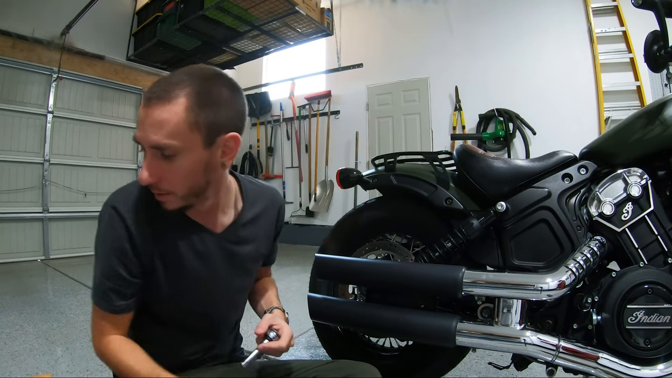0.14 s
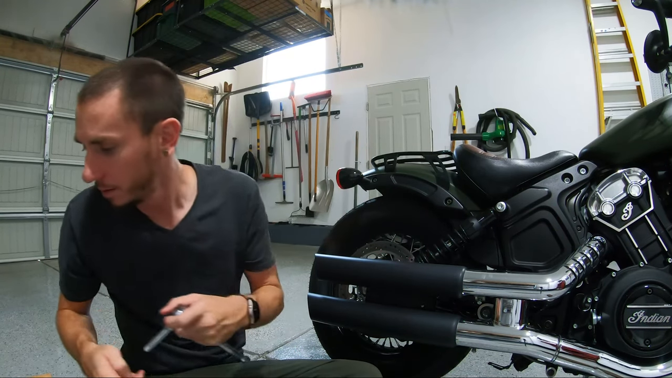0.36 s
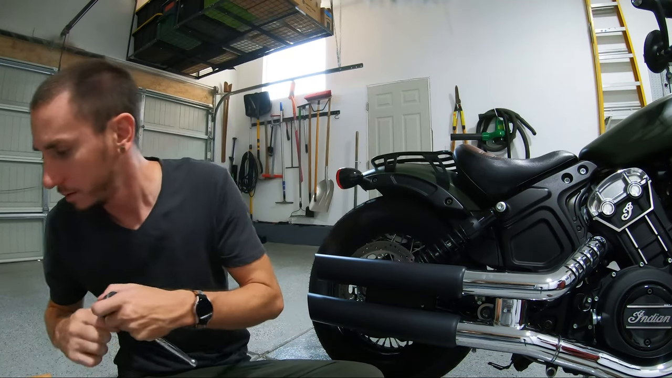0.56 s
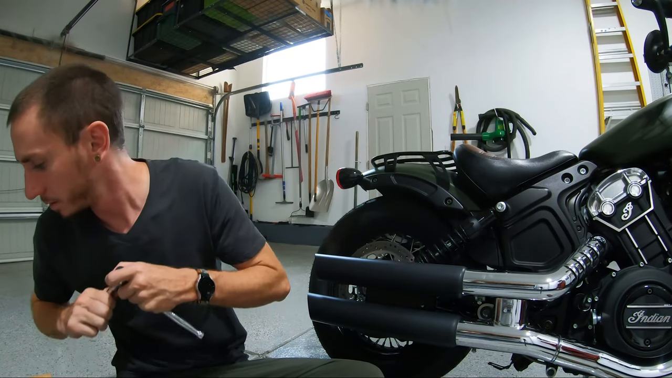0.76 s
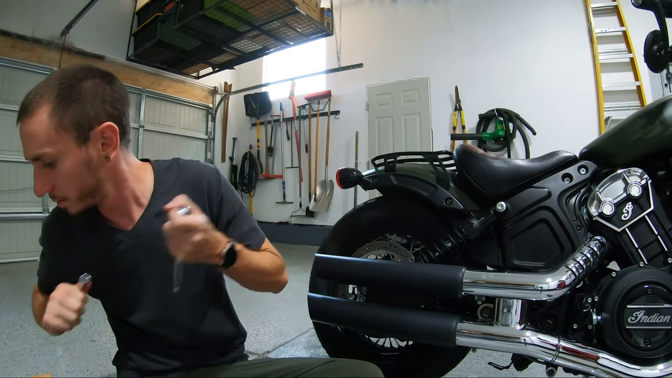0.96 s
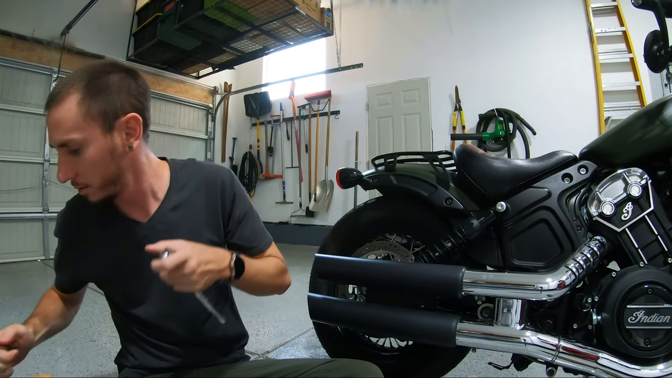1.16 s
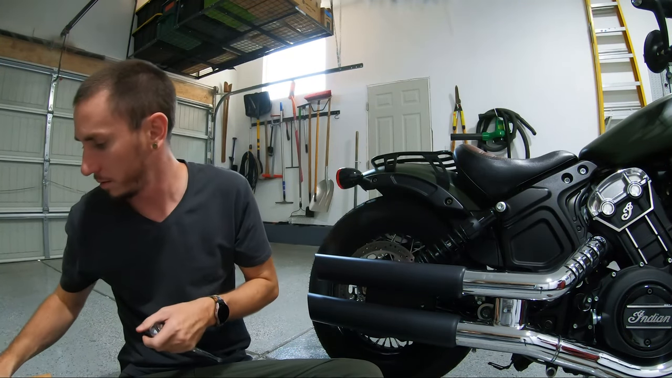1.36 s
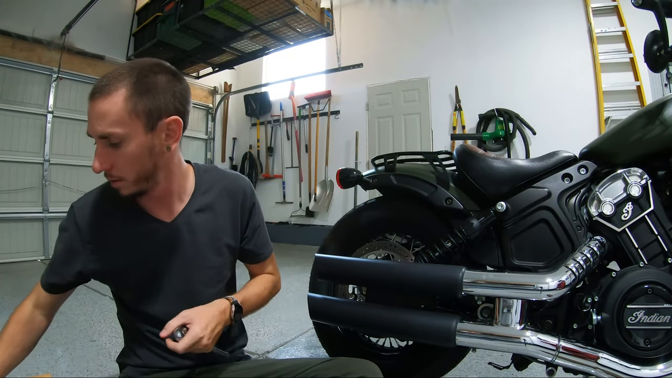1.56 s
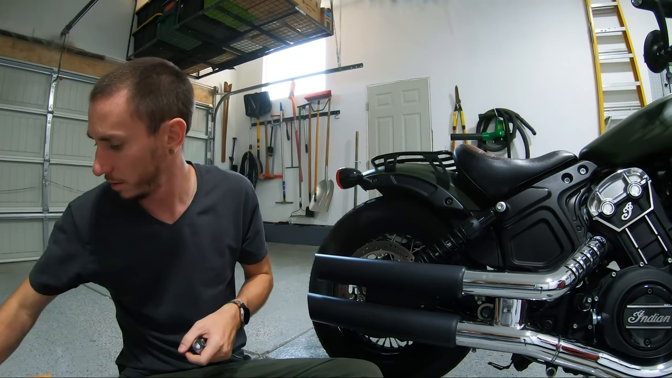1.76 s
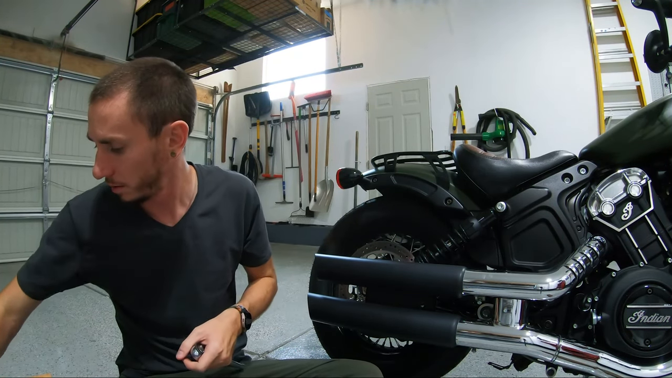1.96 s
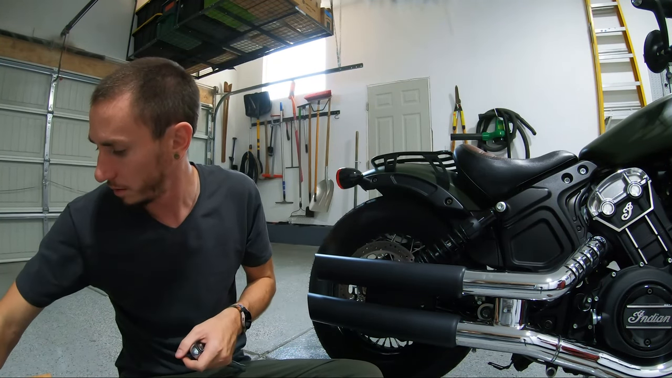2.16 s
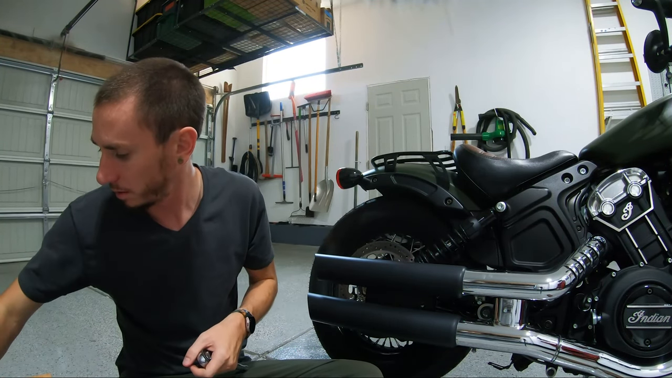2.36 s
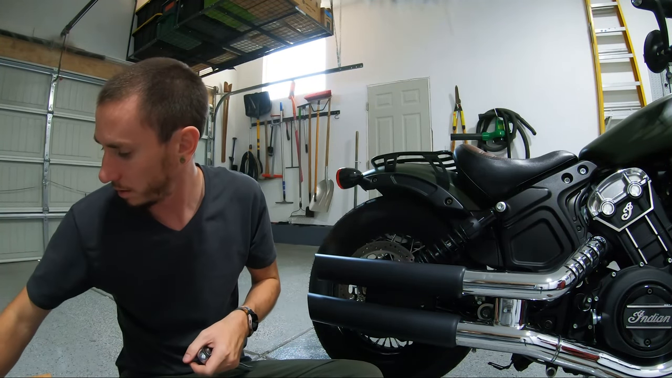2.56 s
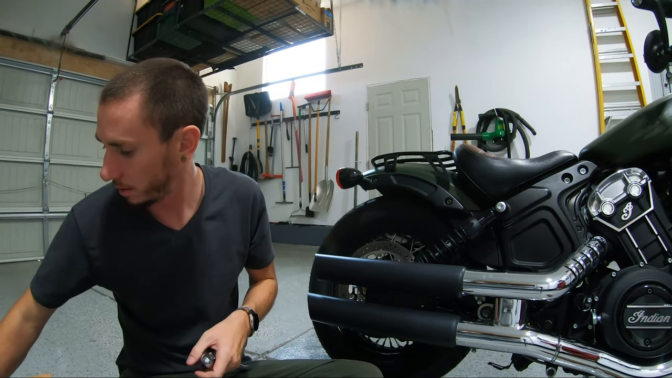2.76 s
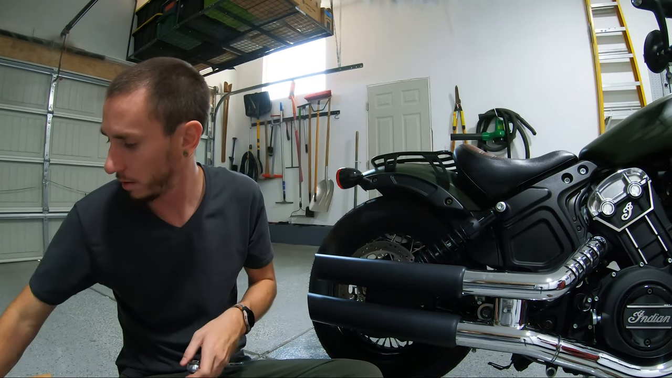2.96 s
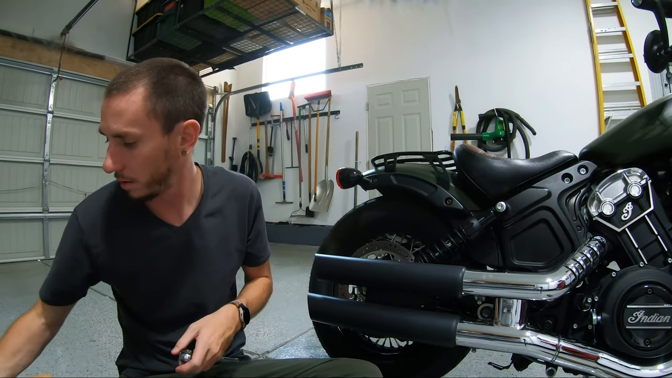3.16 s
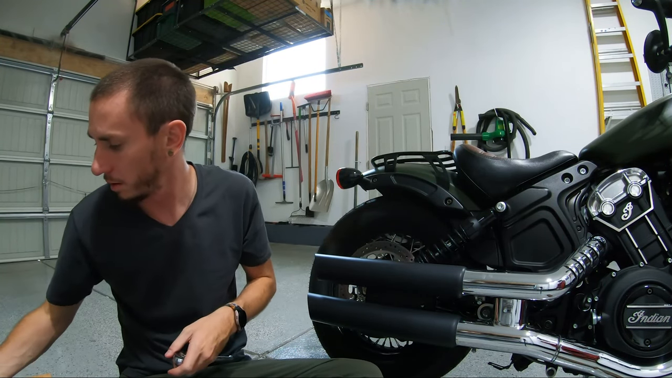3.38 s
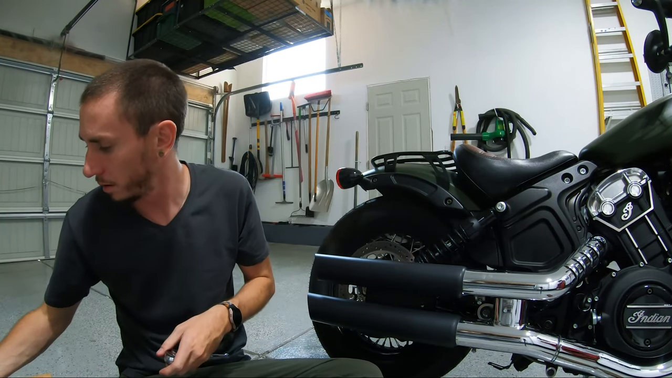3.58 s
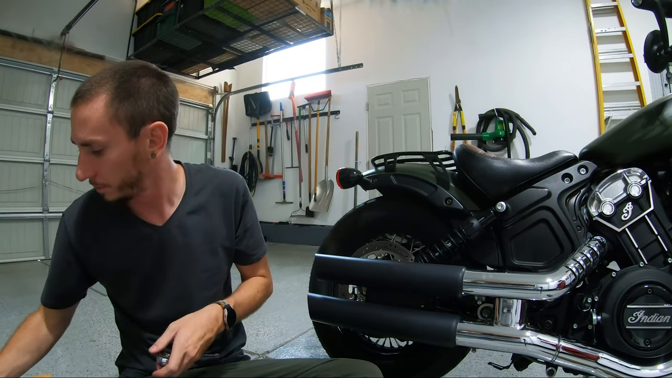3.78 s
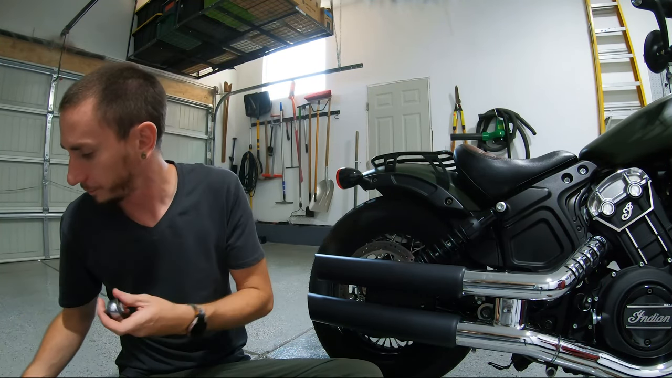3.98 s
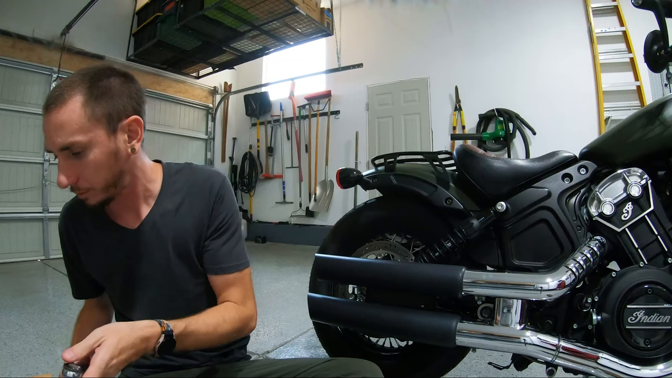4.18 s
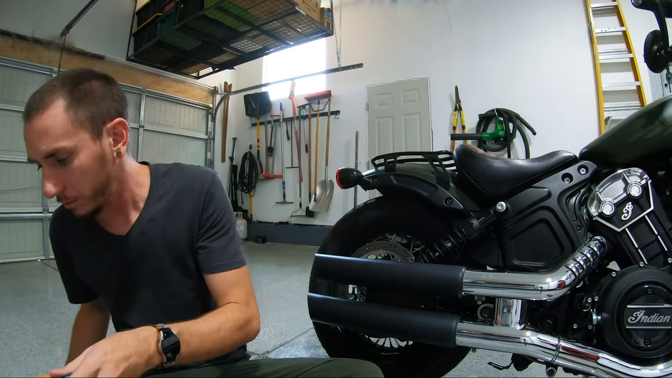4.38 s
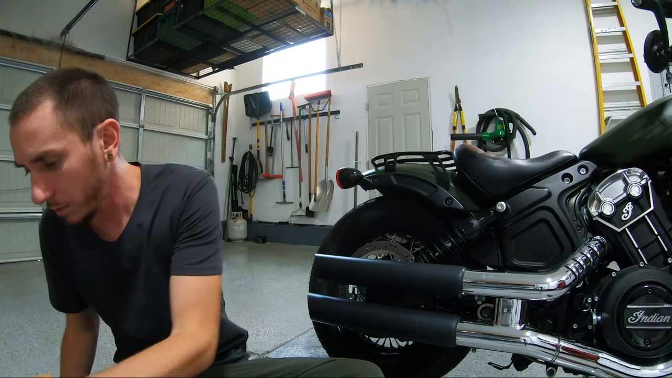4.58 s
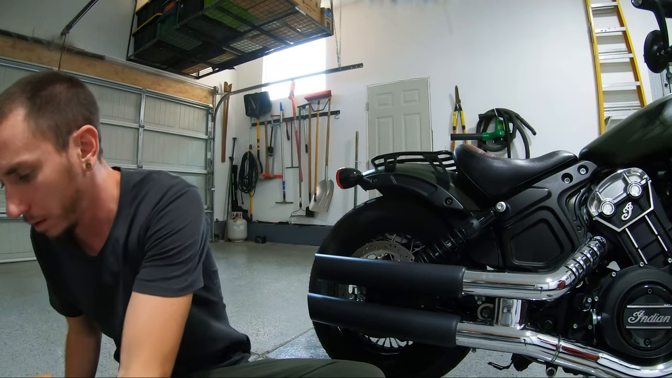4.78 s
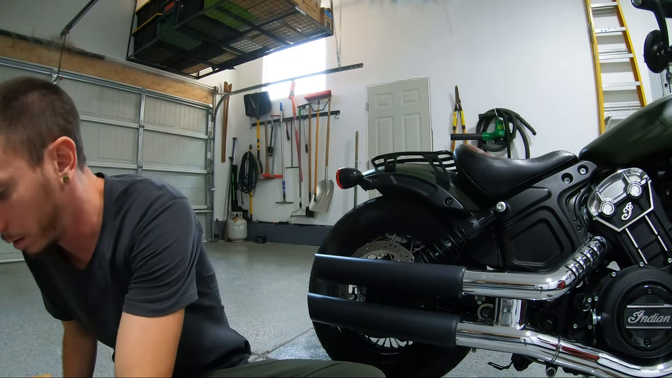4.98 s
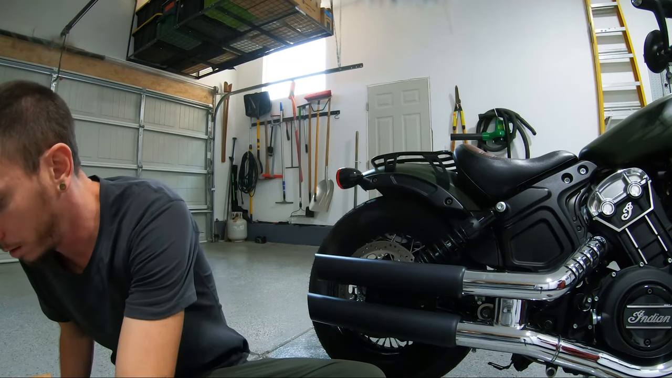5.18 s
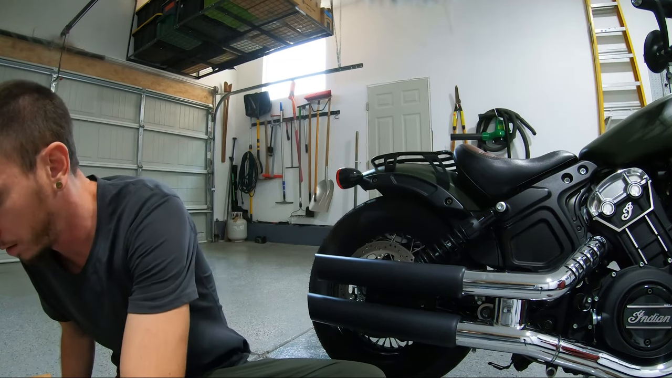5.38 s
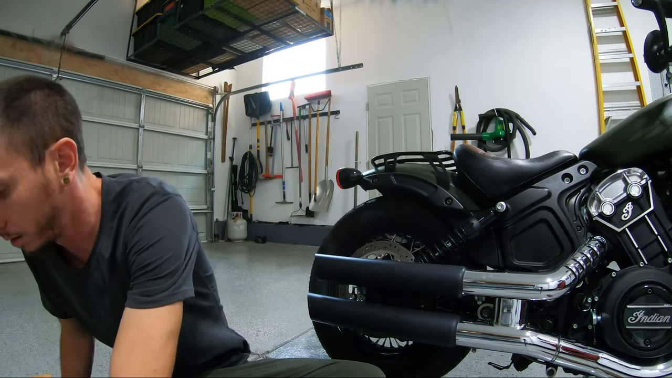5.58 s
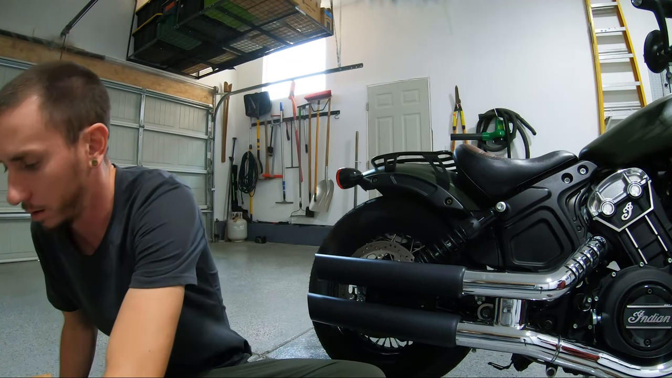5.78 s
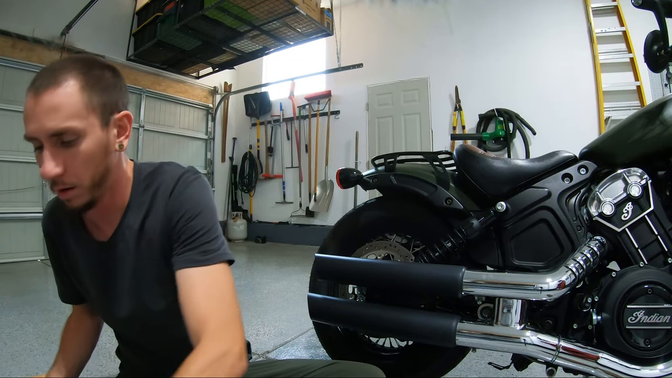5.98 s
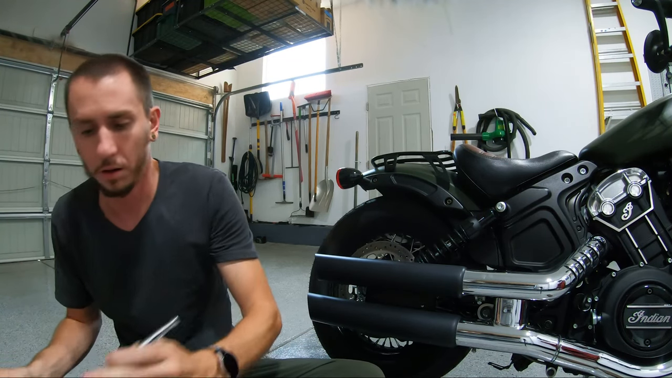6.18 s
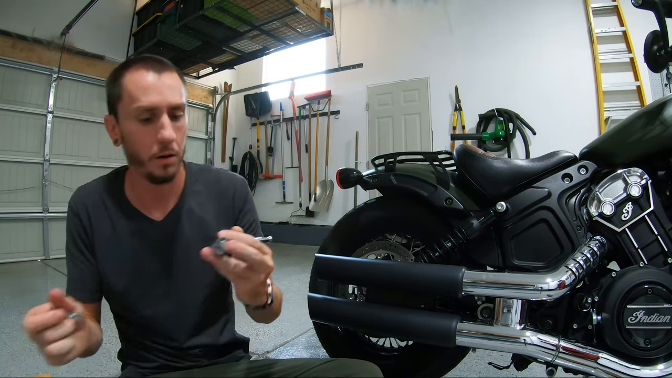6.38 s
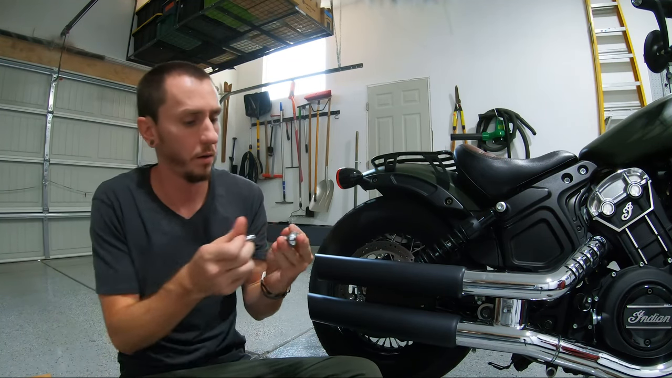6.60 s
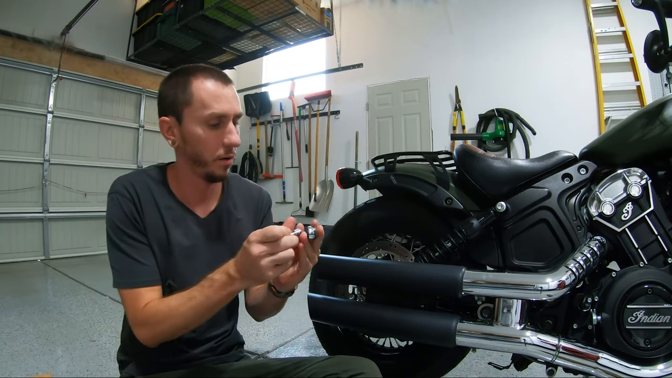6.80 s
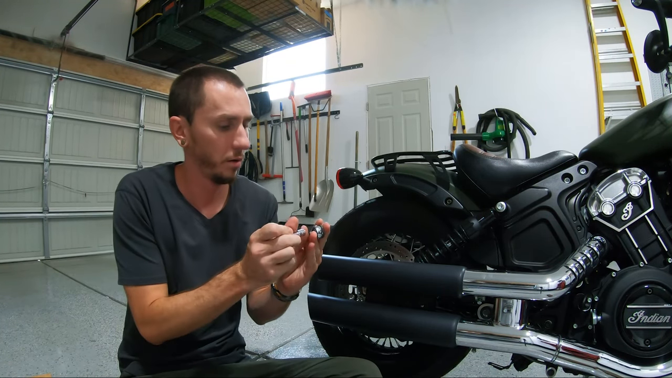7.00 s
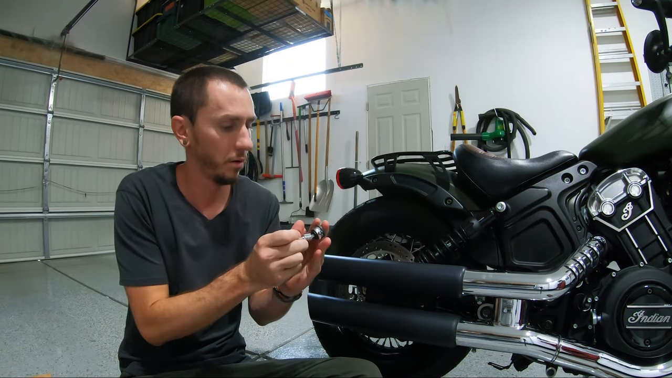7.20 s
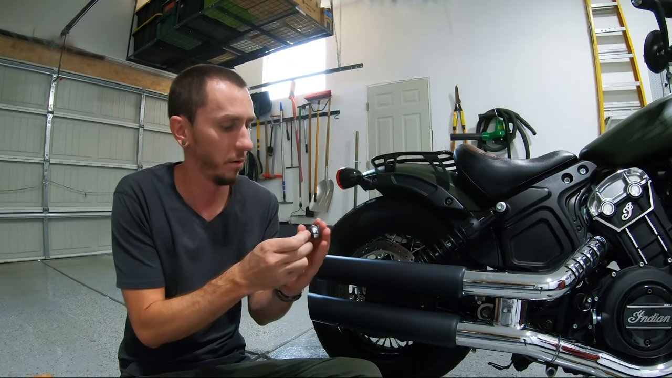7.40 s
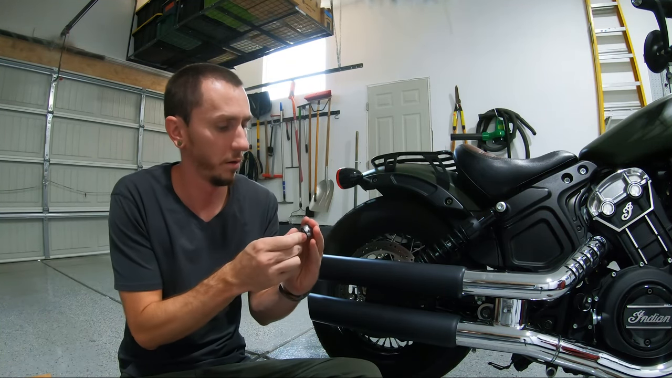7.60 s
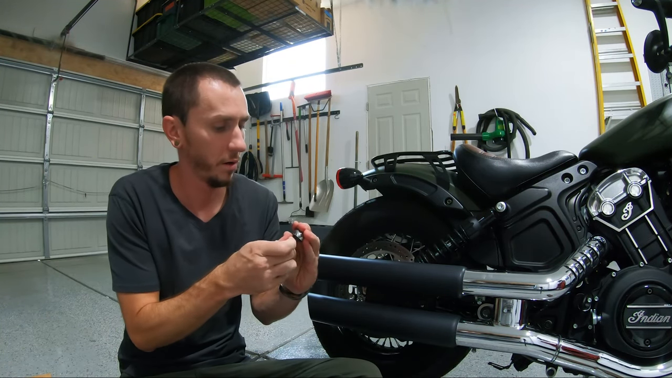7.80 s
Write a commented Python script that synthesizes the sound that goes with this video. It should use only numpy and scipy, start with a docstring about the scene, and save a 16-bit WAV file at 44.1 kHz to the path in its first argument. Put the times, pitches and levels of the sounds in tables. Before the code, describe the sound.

A steady, low, slightly wavering machine hum with soft air noise runs throughout in a hard, reverberant garage. From 0 to 1.3 s, hands and sleeves rustle faintly while a steel handle clinks and a ratchet clicks against a held socket, clearest near 0.75 and 1.0 s. Around 2.1-2.3 s come several light, woody knocks on a socket case, then weak taps near 2.8 s with a small loose-socket clink, and another at 3.1 s. Mostly hum until a faint click at 4.45 s. From 4.9 to 5.45 s a loud rummage erupts: hollow thumps, hard clacks, chattering small parts and bright ringing sockets in two tight clusters, echoing away. Softer knocks and a long-bar ring follow to 5.85 s. At 6.75 and 6.9 s, crisp close snaps with very high pings seat the socket; small irregular ratchet clicks continue to about 7.8 s.

```python
"""A socket case knocks and clatters as someone rummages in it: each blow excites its hollow, panels and hard contacts.
A ratchet clicks close by, as short damped resonances of gripped steel; a small socket pings as it seats on its drive.
Loose steel parts ring in their own modes, small parts chatter after each blow, and hands and sleeves rustle.
A hard garage adds a diffuse echo over a steady low machine hum and air noise; both channels carry the same signal."""
import sys
import numpy as np
from scipy import signal
from scipy.fft import rfft, irfft
from scipy.io import wavfile
from scipy.ndimage import uniform_filter1d

SR = 44100
rng = np.random.default_rng(int(sys.argv[2]) if len(sys.argv) > 2 else 0)


def to_wav(sig):
    """Store sig (one row per channel, or 1-D mono) as 16-bit WAV at the path in sys.argv[1].

    Samples outside -1..1 are clipped; the rate is SR.
    """
    pcm = np.clip(np.atleast_2d(sig), -1, 1) * 32767
    pcm = np.round(pcm).astype(np.int16)
    wavfile.write(sys.argv[1], SR, pcm.T)  # frames by channels


N = 346140

# Blows on the case: t/s, relative force/dB, clack pitch f/Hz, extra thump level/dB from landing over the hollow
BLOWS = [(2.096, -26, 700, -10), (2.108, -17.5, 723, -4), (2.155, -25, 744, -4), (2.236, -14, 970, 4.5),
         (2.273, -13.5, 730, 2), (2.765, -30, 928, -7), (2.797, -31, 930, 0), (3.104, -24, 835, -4),
         (4.929, -19, 1300, 12), (5.066, -16, 970, 9.5), (5.084, -11, 806, 8.5), (5.101, -9, 1006, 4.5),
         (5.293, -11.5, 1050, 8), (5.320, -10.5, 1400, 4.5), (5.343, -14.5, 990, 4), (5.367, -8.5, 826, 1),
         (5.411, -7.5, 855, 1.5), (5.439, -16.5, 1100, 6.5), (5.604, -38, 893, 0), (5.681, -30, 1140, 0),
         (5.833, -23, 1114, -5.5)]
FIRM_BLOW_DB = -10  # the force for which the levels of the case are set
TOP_HZ = 15900  # upper band limit


def undb(db):
    """Amplitude ratio of a level: 20 dB is a factor of ten."""
    return 10 ** (np.asarray(db) / 20)


def unit(x):
    """Normalisation by the root mean square, to rms 1."""
    return x / np.sqrt(np.mean(x ** 2))


def on_log(hz, points):
    """Linear interpolation of (f/Hz, value) points on a logarithmic frequency axis."""
    f, value = np.transpose(points)
    return np.interp(np.log(hz + 1), np.log(f), value)


def noise(spectrum, size):
    """Spectral shaping: white noise weighted in frequency, then set to rms 1."""
    hz = np.arange(size // 2 + 1) * SR / size
    white = rfft(rng.standard_normal(size))
    return unit(irfft(white * undb(on_log(hz, spectrum)), size))


def walk(rate):
    """Random modulation: held random values, rate per second, smoothed by a moving average to rms near 1."""
    hold = int(SR / rate)
    steps = np.repeat(rng.standard_normal(N // hold + 1), hold)
    return unit(uniform_filter1d(steps, hold)[:N])


def fade(t60, size=SR // 2):
    """Exponential decay of a damped mode, 60 dB down after t60 seconds."""
    return np.exp(-np.log(1000) * np.arange(size) / SR / t60)


def burst(spectrum, t60, evenness=0.99):
    """High modal overlap: countless modes decay together, coloured by a minimum-phase filter with a sharp start."""
    size = SR // 2
    envelope = fade(t60)
    modes = rfft(rng.standard_normal(size) * envelope)
    # level the spectrum: so many modes overlap that no single one stands out
    even_modes = modes / (np.abs(modes) + 1e-9) ** min(evenness, 1)
    grain = irfft(even_modes, size) * fade(t60 * 10)
    hz = np.arange(len(modes)) * 2.  # the bins lie 2 Hz apart
    cepstrum = irfft(np.log(undb(on_log(hz, spectrum))), size)
    # folding the cepstrum makes the filter causal: nothing sounds before the blow
    colour = np.exp(2 * rfft(cepstrum[:size // 2], size) - cepstrum[0])
    out = irfft(rfft(grain) * colour, size)
    return out * np.sqrt(np.sum(envelope ** 2) / np.sum(out ** 2))


def ring(modes, scatter_db, detune):
    """Modal superposition: damped sines, whose shares and signs depend on where the blow lands."""
    t = np.arange(SR // 2) / SR
    hz, db, t60 = np.transpose(modes)
    share, shift, side = rng.standard_normal((len(hz), 3)).T
    gains = undb(db + scatter_db * share) * np.sign(side)
    pitches = hz * (1 + detune * shift)
    waves = (g * np.sin(2 * np.pi * f * t) * fade(d) for g, f, d in zip(gains, pitches, t60))
    return sum(waves) / np.sqrt(np.sum(gains ** 2) / 2)


def hump(hz, width, skirt_db):
    """Broad resonance curve: skirt_db at width octaves to either side, steeper beyond."""
    return [(hz * 2 ** (step * width), skirt_db * abs(step) ** .5 * 2 ** (abs(step) - 1))
            for step in (-1.99, -1, -0.66, 1, 2)]


def rattle(sound, count, gap_s, loss_db):
    """Repeated impact: a loose part bounces at uneven gaps, weaker on average each time, at unchanged total energy."""
    gaps, sizes = rng.standard_normal((count, 2)).T
    hits = np.zeros(len(sound))
    hits[0] = 1
    times = np.cumsum(gap_s * np.exp(.5 * gaps))
    at = np.minimum(times * SR, len(hits) - 1).astype(int)
    hits[at] += undb(-loss_db * np.arange(1, count + 1) + 2 * sizes)
    bounced = signal.fftconvolve(sound, hits)[:len(sound)]
    return unit(bounced) * np.std(sound)


def add(track, s, sound):
    """Linear superposition of a sound onto a track from time s in seconds."""
    i = max(int(s * SR), 0)
    track[i:i + len(sound)] += sound[:max(N - i, 0)]


def hum(waver_db=0.66, drift_hz=0.24, air_db=-57.5):
    """Line spectrum of a running machine, each line wavering in level and frequency, over broadband air noise."""
    # Machine lines: f/Hz, rms level/dB
    machine_lines = [(39, -65.5), (50, -60), (64.5, -73), (100, -69.5), (114, -57.5), (125, -64),
                     (150, -60), (175, -53.5), (191.8, -61.5), (200, -61.5), (208.5, -66), (225, -68.5),
                     (275, -66)]
    # Spectrum of the air noise: f/Hz, relative level/dB per Hz
    air_spectrum = [(20, -8.5), (45, -8.5), (80, -1.5), (120, 1), (180, 5), (240, 0), (320, -3.5),
                    (500, -10.5), (1000, -16.5), (2000, -23), (4000, -29), (8000, -32.5), (15500, -34.5)]
    out = undb(air_db) * noise(air_spectrum, N)
    for hz, db in machine_lines:
        turns = np.cumsum(hz + drift_hz * walk(1.466)) / SR + rng.random()
        level = np.sqrt(2) * undb(db + waver_db * walk(2.5))
        out += level * np.sin(2 * np.pi * turns)
    return out


def garage(x, gap_s=0.0024, build_s=0.0063, treble_db=-3.0):
    """Diffuse reverberation: noise that builds up after a gap and decays at a rate set by frequency."""
    # Reverberation time of the room: f/Hz, t60/s
    room_decay = [(150, 0.35), (400, 0.82), (1000, 0.9), (2800, 0.92), (7000, 0.72), (14000, 0.29)]
    size = SR * 3 // 2
    hz, t = np.arange(size // 2 + 1) * SR / size, np.arange(size) / SR
    white, tail = rfft(rng.standard_normal(size)), 0
    tilt = undb(treble_db * hz / TOP_HZ)
    centres = np.array(room_decay)[:, 0]
    # overlapping bands, each with its own decay
    for (_, t60), own in zip(room_decay, np.eye(len(room_decay))):
        band = on_log(hz, np.column_stack([centres, own]))
        tail = tail + irfft(white * band * tilt, size) * fade(t60, size=size)
    tail *= np.clip((t - gap_s) / build_s, 0, 1)
    return signal.fftconvolve(x, tail / np.sqrt(np.sum(tail ** 2)))[:N]


def rustle(grain_db=2):
    """Stick-slip friction: skin and cloth catch and slip in fine grains, and each stroke swells and fades."""
    # Hands and sleeves sliding over tools: t/s at the height of the stroke, length/s, relative level/dB
    slides = [(0.075, 0.81, -60.5), (0.665, 0.96, -62.5), (4.848, 0.4, -64), (6.702, 0.44, -66.5)]
    # Spectrum of the friction noise: f/Hz, relative level/dB per Hz
    cloth_spectrum = [(400, -3.5), (1100, -7.5), (1700, 0.5), (2200, -5), (2800, -10), (4000, -11),
                      (6500, -15.5), (10000, -19), (15000, -34)]
    t = np.arange(N) / SR
    strokes = sum(undb(db) * np.cos(np.pi * np.clip((t - s) / length, -.5, .5)) ** 2
                  for s, length, db in slides)
    return noise(cloth_spectrum, N) * strokes * undb(grain_db * walk(240))


def small_parts(level_db=-23, settle_s=.028, tick_t60=0.0095, count=7):
    """Dissipation by random impacts: each blow shakes small parts, which chatter more softly as they settle."""
    # Spectrum of one tick: f/Hz, relative level/dB per Hz
    chatter_spectrum = [(300, -13.5), (1000, -2), (2200, 0), (4000, -0.5), (7000, -4.5), (9000, -11),
                        (15000, -25)]
    shake_growth = 1.56  # dB per dB of force: harder blows shake more
    out = np.zeros(N)
    ticks = [burst(chatter_spectrum, tick_t60) for _ in range(count)]
    for s, force_db, *_ in BLOWS:
        shake = undb(level_db + shake_growth * (force_db - FIRM_BLOW_DB))
        for tick, (wait, size) in zip(ticks, rng.random((count, 2))):
            delay_s = -settle_s * np.log(1 - wait)  # exponentially distributed
            add(out, s + delay_s, 2 * shake * size * (1 - wait) * tick)
    return out


def sockets(level_db=-4, jangle_db=-9, jangle_t60=0.13):
    """Free vibration and beating: a part rings and rattles in its seat; close mode pairs beat, as it is not quite round."""
    # Loose steel parts struck: t/s, relative level/dB, part
    clinks = [(0.0, -47.5, "handle"), (.117, -57, "handle"), (0.753, -55.5, "held socket"),
              (0.984, -50.5, "held socket"), (1.21, -63.5, "second held socket"),
              (2.799, -46.5, "loose socket"), (5.074, -31, "large socket"), (5.089, -28, "small socket"),
              (5.095, -27.5, "large socket"), (5.103, -28, "small socket"), (5.324, -29, "large socket"),
              (5.342, -30, "small socket"), (5.369, -25.5, "large socket"), (5.414, -31, "small socket"),
              (5.439, -28, "large socket"), (5.567, -48, "small socket"), (5.837, -45.5, "long bar")]
    # Modes of each part by name: f/Hz, relative level/dB, t60/s
    part_modes = { "large socket": [(4160, -9, .12), (5570, -14.5, .12), (5870, -14, 0.09),
                  (6940, -7, 0.076), (7255, -5, 0.22), (7320, -10, .2)], "small socket": [(9880, -1, .1),
                  (10630, -15, .1), (11030, 2, .11), (11240, -6.5, .13), (13340, -19.5, .1),
                  (15000, -13.5, .18), (15710, -17.5, .14)], "loose socket": [(5500, -4, 0.16),
                  (6850, 3, 0.038)], "second held socket": [(5920, 0, 0.21)],
                  "held socket": [(3940, -3, 0.061), (7483, -3, .6)], "handle": [(1690, -4.5, 0.22),
                  (1936, -0.5, 0.14), (2835, -5, .14), (3900, -9, .1), (5450, -8, 0.12), (6400, -4, .14)],
                  "long bar": [(1276.4, -7, 0.65), (1335, -3, .35), (3410, -8, 0.18), (8100, -12, 0.23)]}
    out = np.zeros(N)
    for s, db, part in clinks:
        modes = part_modes[part]
        strongest_hz = max(modes, key=lambda mode: mode[1])[0]
        # it jostles its neighbours, which jangle briefly around its strongest pitch
        jangle = burst(hump(strongest_hz, width=.4, skirt_db=-13), jangle_t60)
        sound = ring(modes, scatter_db=2.0, detune=0.00024) + undb(jangle_db) * jangle
        add(out, s, undb(db + level_db) * rattle(sound, count=3, gap_s=.012, loss_db=17))
    return out


def ratchet(modes_db=-9, tick_db=-3, peak_db=-5, edge_db=-34, tick_t60=0.015, edge_t60=0.031):
    """Damped steel impact: snaps chatter, the grip picks and damps one resonance, and harder contact is brighter."""
    # Clicks against sockets: t/s, relative force/dB, strongest resonance f/Hz
    clicks = [(0.118, -47, 2780), (0.619, -42.5, 6850), (.751, -33, 4300), (.986, -31, 6800),
              (1.209, -55, 6000), (1.249, -56.5, 5900), (2.095, -41, 7000), (4.449, -54, 3500),
              (4.928, -34, 6840), (5.368, -24, 6960), (5.801, -40, 7560), (5.82, -36.5, 3200),
              (6.752, -31.5, 8260), (6.889, -32, 6700), (6.969, -42, 6800), (7.155, -37.5, 6620),
              (7.18, -50, 6530), (7.357, -55, 3480), (7.418, -34.5, 6640), (7.555, -50.5, 5170),
              (7.583, -45, 6350), (7.638, -47, 8940), (7.814, -32.5, 2630)]
    # Pings of the small socket as it seats on the drive: t/s, level/dB
    pings = [(6.754, -16.5), (6.888, -25.5), (7.155, -45), (7.418, -46.5), (7.816, -33)]
    # Modes of the gripped ratchet, then of the ping: f/Hz, relative level/dB, t60/s
    ratchet_modes = [(1550, -39, 0.023), (1977, 0, 0.026), (2620, -0.5, 0.06), (3480, -1.5, 0.039),
                     (4350, -3, 0.045), (4600, -12, 0.03), (5130, 0, 0.06), (6590, 2.5, 0.11),
                     (6910, 15, 0.028), (8000, -7, 0.075), (7900, 9, 0.041), (9270, -5, 0.047),
                     (8770, -9.5, 0.0095)]
    ping_modes = [(13970, -6.5, .02), (13820, 0.5, 0.027), (14350, -12, .015)]
    # Spectra of the contact tick and of its bright edge: f/Hz, relative level/dB per Hz
    steel_spectrum = [(500, -67), (1300, -11.5), (2500, -7), (4500, 0), (7000, 1), (9000, -3),
                      (12000, -43.5)]
    edge_spectrum = [(6000, -17), (9500, -0.5), (12000, -4.5), (15000, -19.5), (16000, 1)]
    # the edge grows faster than the click (dB per dB), up to a limit
    firm_click_db, brightest_click_db, edge_growth = -32, -30.5, 3.9
    out = np.zeros(N)
    for s, force_db, hz in clicks:
        peak = undb(peak_db) * burst(hump(hz, width=0.29, skirt_db=-8.5), tick_t60)
        modes = undb(modes_db) * ring(ratchet_modes, scatter_db=2, detune=.015)
        tick = undb(tick_db) * burst(steel_spectrum, tick_t60)
        excess_db = min(force_db, brightest_click_db) - firm_click_db
        edge = undb(edge_db + edge_growth * excess_db) * burst(edge_spectrum, edge_t60)
        snap = undb(force_db) * (modes + tick + peak) + edge
        add(out, s, rattle(snap, count=2, gap_s=.0025, loss_db=9.5))
    for s, db in pings:
        add(out, s, undb(db) * ring(ping_modes, scatter_db=2, detune=.003))
    return out


def case(panel_db=-8.0, thump_db=-12, modes_db=-16, hollow_db=-12, crack_db=-23,
         panel_t60=0.042, thump_t60=0.065, crack_t60=0.022, give_t60=0.0044,
         bass_hz=110, sag=0.2, even_db=-14):
    """Impact on a compliant box: a blow thumps the hollow, and two contacts clack panels and crack; returns body, cracks."""
    # Distinct modes of the case: f/Hz, relative level/dB, t60/s
    case_modes = [(173, -7.5, 0.14), (199.2, 6, 0.15), (261.4, 3, 0.16), (322, 7, 0.043), (344, 14, 0.067),
                  (365, -6.5, 0.076), (470, 5, 0.029), (528.5, 10.5, 0.06), (584, -1.5, 0.025),
                  (667, -10, 0.13), (752, 16, 0.046), (890, -14.5, .04), (1146, 3.5, 0.029),
                  (1370, -1, 0.09), (1790, -1, 0.023)]
    # Spectrum of the hollow: f/Hz before the shift with force, relative level/dB per Hz
    thump_spectrum = [(60, -30), (120, -16.5), (190, -7.5), (260, 4.5), (380, -1.5), (520, -5), (800, -21),
                      (2000, -38)]
    # Dense, quickly damped panel modes: multiple of the clack pitch, relative level/dB per Hz
    panel_spectrum = [(.2, -34.5), (.4, -4.5), (.65, 2), (1, 2), (1.5, -0.5), (2.2, -7), (3.5, -17),
                      (5, -30.5), (9, -55.5)]
    # Hard crack of contact: f/Hz, relative level/dB per Hz
    crack_spectrum = [(800, -11), (2000, 6.5), (3200, 12.5), (4800, 5), (6800, 1.5), (8200, -15.5),
                      (11500, -17), (15500, -34)]
    thump_growth, crack_growth = 1.41, 1.21  # dB per dB of force: harder blows are deeper and sharper
    # a harder contact clacks higher and cracks more
    usual_clack_hz, crack_db_per_octave = 970, 7.5
    # wait/s, level/dB: a tool touches with one end, then lands on the other
    contacts = ((0, 0), (.005, 2))

    body, cracks = np.zeros(N), np.zeros(N)
    give = 1 - fade(give_t60)  # the case gives, so a blow takes a moment to build
    for s, force_db, hz, centred_db in BLOWS:
        excess_db = force_db - FIRM_BLOW_DB
        low_db = hollow_db + thump_growth * excess_db + centred_db
        octaves = np.log2(hz / usual_clack_hz)
        hard_db = crack_db + crack_growth * excess_db + crack_db_per_octave * octaves
        # a heavier blow moves more of the case and thumps deeper
        pitch_ratio = undb(-sag * max(low_db - even_db, -6))
        thump = undb(thump_db) * burst(np.array(thump_spectrum) * [pitch_ratio, 1], thump_t60)
        modes = undb(modes_db) * ring(case_modes, scatter_db=-4.0, detune=.006)
        add(body, s, undb(low_db) * (thump + modes) * give)
        for wait, contact_db in contacts:
            clack = burst(np.array(panel_spectrum) * [hz, 1], panel_t60) * give
            add(body, s + wait, undb(force_db + panel_db + contact_db) * clack)
            crack = burst(crack_spectrum, crack_t60) * give
            add(cracks, s + wait, undb(hard_db + contact_db) * crack)
    # a small box radiates no deep bass
    high_pass = signal.butter(4, bass_hz, "high", fs=SR, output="sos")
    return signal.sosfilt(high_pass, [body, cracks])


def scene(case_room_db=-4.5, crack_room_db=-7, socket_room_db=-3, chatter_room_db=-7, hand_room_db=-10):
    """Direct-to-reverberant ratio: the case off to the side is roomy; sharp contacts and near hands are drier."""
    knocks, cracks = case()
    sources = [(knocks, case_room_db), (cracks, crack_room_db), (sockets(), socket_room_db),
               (small_parts(), chatter_room_db), (ratchet() + rustle(), hand_room_db)]
    direct = sum(sound for sound, _ in sources)
    echo = garage(sum(undb(room_db) * sound for sound, room_db in sources))
    return np.tile(direct + echo + hum(), (2, 1))


def record(dry):
    """Band limitation: a steep elliptic low-pass cuts the top of the treble."""
    low_pass = signal.ellip(10, .2, 80, TOP_HZ, fs=SR, output="sos")  # ripple .2 dB, stopband -80 dB
    return signal.sosfilt(low_pass, dry)


dry = scene()
out = record(dry)
to_wav(out)
```